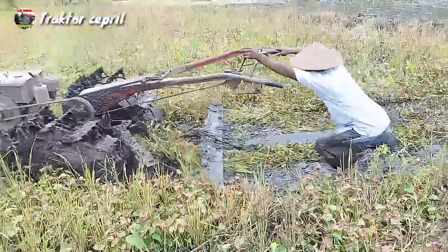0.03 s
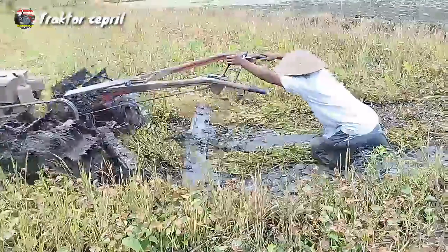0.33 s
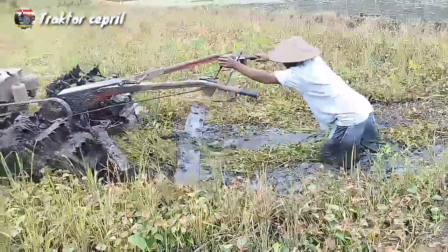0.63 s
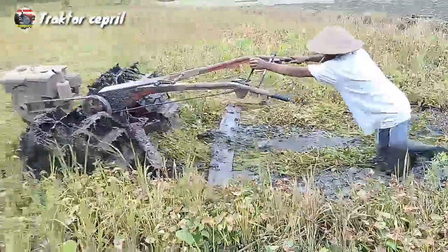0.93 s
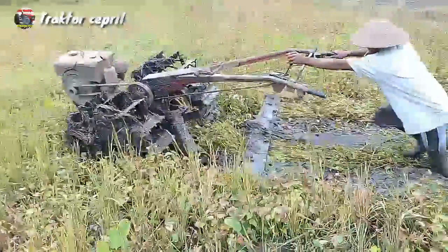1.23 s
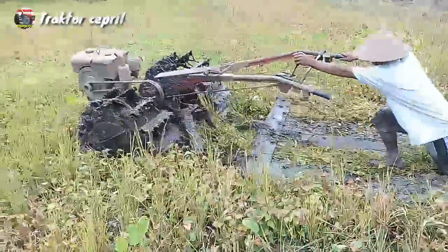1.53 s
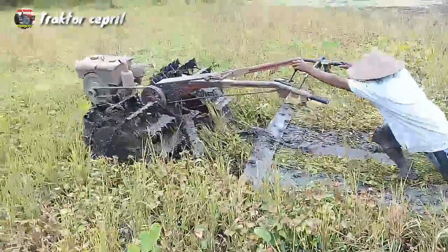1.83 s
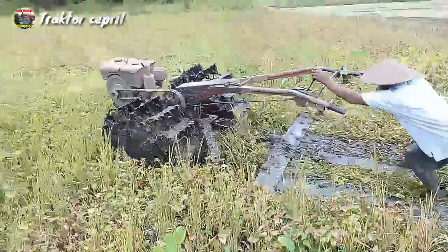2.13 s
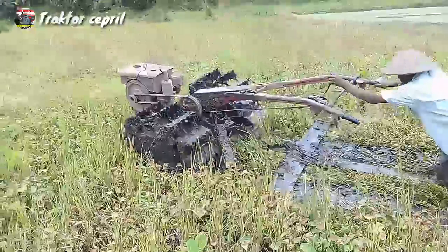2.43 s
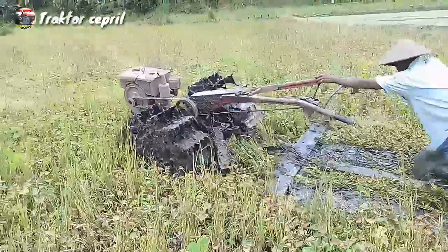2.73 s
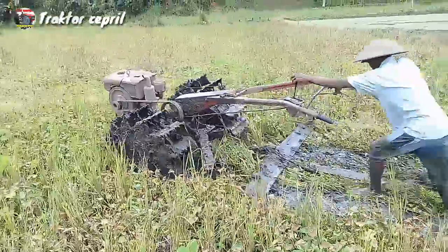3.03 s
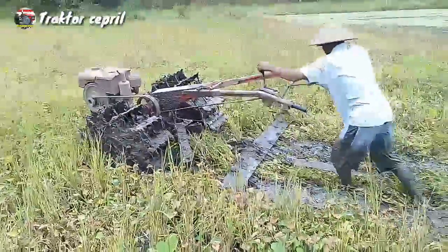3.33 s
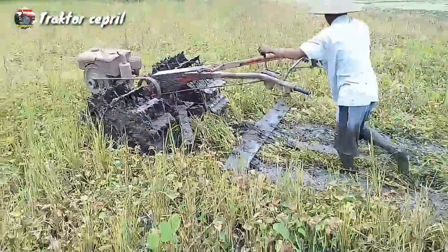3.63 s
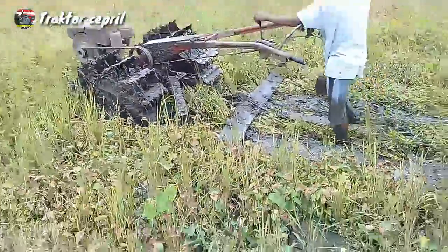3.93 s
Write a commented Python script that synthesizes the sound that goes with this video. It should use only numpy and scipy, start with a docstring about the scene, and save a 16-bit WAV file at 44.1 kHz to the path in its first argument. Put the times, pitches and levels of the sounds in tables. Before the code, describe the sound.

Walking tractor engine thumping and clattering through mud, gradually slowing before it speeds up again.

```python
"""Walking tractor in a wet field

A single-cylinder diesel slows under load and picks up again. Each cycle is a metallic combustion
knock, then an exhaust thump with a hissing blast through the muffler; gears clatter in between.
Mud spatters off the cage wheels and sprays once, the wet belt squeaks, and gusts bump the microphone."""
import sys
import numpy as np
from scipy import signal
from scipy.fft import rfft, irfft
from scipy.io import wavfile
from scipy.ndimage import uniform_filter1d

SR = 44100
rng = np.random.default_rng(int(sys.argv[2]) if len(sys.argv) > 2 else 0)


def persist_wave(psi):
    """Save psi, clipped to +-1, as 16-bit WAV."""
    counts = np.round(np.clip(psi, -1, 1) * 32767).astype(np.int16)
    wavfile.write(sys.argv[1], SR, np.atleast_2d(counts).T)


N = 176400
T = np.arange(N) / SR


def from_db(db):
    """Decibels to gain."""
    return 10 ** (np.asarray(db) / 20)


def unit_rms(x):
    """Scale to rms 1."""
    return x / np.sqrt(np.mean(x ** 2) + 1e-20)


def colour(x, spectrum):
    """EQ a signal with a curve of (frequency [Hz], relative level [dB]); rms 1."""
    hz, db = np.transpose(spectrum)
    bins_hz = np.maximum(np.arange(N // 2 + 1) * SR / N, 1)
    gain = from_db(np.interp(np.log(bins_hz), np.log(hz), db))
    return unit_rms(irfft(rfft(x) * gain, N))


def noise(spectrum):
    """Coloured noise of rms 1."""
    return colour(rng.standard_normal(N), spectrum)


def fader(points):
    """Gain that rides through points of (time [s], level [dB])."""
    return from_db(np.interp(T, *np.transpose(points)))


def bursts(times, levels_db, rise, t60, hold=0):
    """Envelope of bursts that rise, hold and fall by 60 dB; durations in seconds."""
    out = np.zeros(N)
    for start, db in zip(times, levels_db):
        span = slice(max(int(start * SR), 0), max(int((start + rise + hold + t60) * SR), 0))
        age = T[span] - start
        fall_db = 60 * np.maximum(age - rise - hold, 0) / t60
        out[span] += np.clip(age / rise, 0, 1) * from_db(db - fall_db)
    return out


def swells(rows):
    """Envelope of bursts, each with its own rise and decay."""
    return sum(bursts([start], [db], rise, t60) for start, rise, t60, db in rows)


def resonate(x, resonances):
    """Ring parallel band-pass resonators of alternating polarity."""
    out = 0
    for k, (hz, width, db) in enumerate(resonances):
        radius = np.exp(-np.pi * width / SR)
        poles = [1, -2 * radius * np.cos(2 * np.pi * hz / SR), radius ** 2]
        gain = (-1) ** k * from_db(db) * (1 - radius ** 2) / 2
        out = out + gain * signal.lfilter([1, 0, -1], poles, x + 1e-18)
    return out


def grain_sizes(spread_db):
    """Random gains for tiny impacts: many small, a few big."""
    return from_db(spread_db * np.minimum(rng.exponential(1, N), 4))


# The pulse of the exhaust: (time [s], relative thump level [dB], relative blast level [dB])
EXHAUST_STROKES = [(-0.016, -16.5, -14), (0.1088, -14, -20.0), (0.2362, -15, -22.5), (0.3627, -14.5, -21.5),
                   (0.4922, -15, -20), (0.621, -17.5, -21.5), (0.7515, -15.5, -21), (0.8826, -14, -22.5),
                   (1.0168, -19, -22), (1.1533, -20, -23), (1.2895, -15.5, -22.5), (1.43, -18, -23),
                   (1.5743, -17, -22.0), (1.7181, -17, -23.5), (1.8672, -17, -23), (2.0172, -17, -22.0),
                   (2.1708, -16.5, -25), (2.3284, -17.5, -24.5), (2.4877, -18, -25), (2.6532, -15, -22.5),
                   (2.8202, -19, -26.5), (2.9896, -18, -23.5), (3.16, -18, -25), (3.3248, -17.5, -23),
                   (3.4767, -17, -21.5), (3.6196, -14.5, -21), (3.7532, -15, -20), (3.8787, -14.5, -21)]
# Low body of the pipe: (frequency [Hz], relative level [dB], t60 [s], polarity)
PIPE_MODES = [(128.6, -8.5, 0.13, -1), (84.3, -4, 0.069, -1), (113.1, 1.04, 0.032, 1)]


def exhaust_thumps(gain_db=17):
    """Each release of gas sets the low modes of the exhaust ringing."""
    out = np.zeros(N)
    for start, db, _ in EXHAUST_STROKES:
        span = (T >= start) & (T < start + .25)
        age = T[span] - start
        for hz, mode_db, t60, polarity in PIPE_MODES:
            envelope = from_db(db + gain_db + mode_db - 60 * age / t60)
            out[span] += polarity * envelope * np.sin(2 * np.pi * hz * age)
    return out


# Tinny ring of the muffler: (frequency [Hz], bandwidth [Hz], relative level [dB])
MUFFLER_MODES = [(1045, 55.4, 8), (1424, 133, -1), (1820, 330, -12), (2705, 104, -4), (3735, 115, -10),
                 (4298, 88, -7.5), (5408, 119, 0), (5320, 600, -11.5), (6210, 170, -10.5),
                 (10120, 980, -19.5)]
# Hiss of the escaping gas: (frequency [Hz], relative level [dB])
JET_EQ = [(250, -11.5), (600, 10.5), (1100, -3), (2500, 12), (3300, -4), (6000, 8), (7600, -55),
          (11000, -6.5), (15500, -17)]


def exhaust_blasts(ring_db=18, hiss_db=-2, scatter_db=2.5):
    """A short turbulent jet rings the muffler with each thump, in a slightly new colour each time."""
    times, _, db = np.transpose(EXHAUST_STROKES)
    puff = bursts(times, db, rise=0.0042, t60=0.034, hold=0.0019)
    tail = bursts(times, db - 16.5, rise=0.0042, t60=.13)
    flow = puff + tail
    rings = []
    for jet in np.split(flow * rng.standard_normal(N), (times[1:] * SR).astype(int)):
        modes = [(hz, width, level + scatter_db * rng.normal()) for hz, width, level in MUFFLER_MODES]
        rings.append(resonate(jet, modes))
    return from_db(ring_db) * np.concatenate(rings) + from_db(hiss_db) * flow * noise(JET_EQ)


# Bumps of wind: (time [s], rise [s], t60 [s], level [dB])
GUSTS = [(-.02, 0.019, 0.45, -23.5), (.158, 0.0026, 0.029, -19), (.476, 0.0037, 0.2, -12),
         (.53, 0.041, 0.18, -23.5), (.922, 0.0088, 0.093, -11), (.95, 0.047, 0.34, -16.5),
         (1.068, 0.01, .08, -11), (1.10, 0.035, 0.53, -22), (2.195, 0.018, 0.15, -16),
         (2.23, 0.042, 0.57, -27.5), (2.66, 0.031, 0.67, -22), (2.72, 0.045, 0.54, -24)]
# Their dull boom: (frequency [Hz], relative level [dB])
GUST_EQ = [(20, -43), (60, -5.5), (120, -1.5), (195, -5.5), (260, -3.5), (350, -6), (480, -11.5),
           (900, -31), (3000, -76)]


def gusts():
    """Wind buffets the microphone: low noise, compressed so that each gust stays full."""
    air = noise(GUST_EQ)
    compressed = air / np.sqrt(uniform_filter1d(air ** 2, size=500) + 1e-3)
    return swells(GUSTS) * colour(compressed, GUST_EQ)


# Tone of the gears, belt and cage wheels: (frequency [Hz], relative level [dB])
CLATTER_EQ = [(30, -17), (200, -2.5), (330, 1), (560, -5), (800, 4.5), (1050, 2), (1500, -0.5),
              (2000, -5.5), (2600, -8), (3300, -22.5), (4400, -21.5), (5400, -14), (6500, -22), (7800, -35),
              (10300, -23.5), (13000, -32), (15500, -37)]
# Fader ride of the clatter: (time [s], level [dB])
CLATTER_FADER = [(0, -29.5), (.6, -31), (1.1, -29), (1.5, -32.5), (2.1, -32.5), (2.7, -32.5), (3.1, -34.5),
                 (3.5, -35), (4, -31.5)]


def drive_clatter(contacts_per_s=500, contact_db=-9.5):
    """Dense small contacts rattle in the drive over its steady rush."""
    sizes = grain_sizes(spread_db=2.5) * rng.choice([-1, 1], N)
    contacts = unit_rms(sizes * (rng.random(N) < contacts_per_s / SR))
    rush = rng.standard_normal(N)
    return fader(CLATTER_FADER) * colour(rush + from_db(contact_db) * contacts, CLATTER_EQ)


# Low end of the frame: (frequency [Hz], relative level [dB])
RUMBLE_EQ = [(15, -55), (30, -41), (50, -2.5), (70, 1), (130, 0), (195, -11.5), (270, -11), (500, -22.5),
             (1000, -59)]


def frame_rumble(level_db=-30.5):
    """The frame shakes with a steady bed of bass noise."""
    return from_db(level_db) * noise(RUMBLE_EQ)


# Fader ride of the spatter: (time [s], level [dB])
SPATTER_FADER = [(0, -45.5), (.6, -46), (1.15, -43), (1.5, -48), (2.1, -49), (2.6, -51), (3.0, -53.5),
                 (3.3, -51), (3.6, -61), (4, -50)]
# Its wet sizzle: (frequency [Hz], relative level [dB])
SPATTER_EQ = [(1200, -7), (3300, -4), (5400, -0.5), (7800, -10), (10500, -3.5), (15500, -8)]


def mud_spatter(drops_per_s=1300, t60=0.013):
    """Droplets off the cage wheels land at random, each a tiny splash."""
    drops = grain_sizes(spread_db=4) * (rng.random(N) < drops_per_s / SR)
    decay = from_db(-60 / (t60 * SR))
    splashes = signal.lfilter([1], [1, -decay], drops + 1e-18)
    return fader(SPATTER_FADER) * colour(splashes * rng.standard_normal(N), SPATTER_EQ)


def cycle_times(phase):
    """The moments that lie this fraction of a cycle after each exhaust stroke."""
    times = np.array(EXHAUST_STROKES)[:, 0]
    gaps = np.diff(times)
    return times + phase * np.r_[gaps, gaps[-1]]


# Tapping pattern of the valves: (delay after the exhaust [cycles], average level [dB])
VALVE_TAPS = [(.2, -30), (.4, -36.5), (.62, -66.5)]


def valve_taps(scatter_db=6.5):
    """The valve gear taps softly and unevenly at set points of the cycle."""
    envelope = np.zeros(N)
    for phase, db in VALVE_TAPS:
        levels_db = db + scatter_db * rng.standard_normal(len(EXHAUST_STROKES))
        envelope += bursts(cycle_times(phase), levels_db, rise=0.0016, t60=TAP_T60_S)
    return envelope * noise(CLATTER_EQ)


def intake(hz=769, width_hz=23, level_db=-32):
    """The intake pipe sounds a hollow note as the cylinder fills."""
    times = cycle_times(phase=0.3)
    note = unit_rms(resonate(rng.standard_normal(N), [(hz, width_hz, 0)]))
    return note * bursts(times, np.full(len(times), level_db), rise=0.014, t60=0.057)


# Combustion hits: (time [s], relative level [dB])
KNOCKS = [(0.083, -17), (0.2099, -16.5), (0.3364, -16), (0.4663, -15.5), (0.5949, -17.0), (0.7245, -14),
          (0.8554, -12.5), (0.9895, -15.5), (1.123, -12.5), (1.2605, -14), (1.3996, -16.0), (1.5436, -17.0),
          (1.6886, -16), (1.8361, -17.5), (1.9863, -18.5), (2.1395, -18.0), (2.2937, -17.5),
          (2.4535, -19.5), (2.618, -18), (2.785, -18.5), (2.9535, -20.5), (3.1254, -19), (3.2917, -20.5),
          (3.446, -20), (3.5901, -17), (3.726, -14.5), (3.8543, -19.5), (3.9738, -21)]
# The flam within each hit: (delay after ignition [s], relative level [dB])
SLAPS = [(.0008, -3.5), (.004, 2.5), (.012, -2)]
# Metallic ring of the block: (frequency [Hz], bandwidth [Hz], relative level [dB])
BLOCK_MODES = [(754, 83, -4), (1058, 54, 1.5), (1398, 37.5, 5), (1523, 72, 6), (1695, 30, -1.5),
               (1943, 61, -4.5), (2200, 260, -9.5), (2500, 410, -13), (2987, 110, -20)]
# Dry crack on top: (frequency [Hz], relative level [dB])
CRACK_EQ = [(300, -5), (700, -4), (1200, 0.5), (1700, 3), (2800, -7), (3500, -28), (6000, -21), (8000, -38),
            (15000, -29)]


def combustion_knocks(strike_db=32.5, buzz_db=6, crack_db=-6, jitter_s=0.00041, scatter_db=1):
    """Combustion and piston slap strike the block with a dry crack and leave it buzzing."""
    times, db = np.transpose(KNOCKS)
    force = bursts(times, db + buzz_db, rise=0.009, t60=0.24) * rng.standard_normal(N)
    for delay, slap_db in SLAPS:
        lateness, accent = rng.standard_normal((len(times), 2)).T
        hits = np.clip((times + delay + jitter_s * lateness) * SR, 0, N - 1).astype(int)
        force[hits] += from_db(db + strike_db + slap_db + scatter_db * accent)
    crack = bursts(times, db + crack_db, rise=0.00062, t60=0.13) * noise(CRACK_EQ)
    return resonate(force, BLOCK_MODES) + crack


def casing_clacks(start_hz=2469, end_hz=1427, fall_s=0.00444, gain_db=1):
    """The casing answers each knock with a short ring that falls in pitch."""
    out = np.zeros(N)
    for start, db in KNOCKS:
        span = (T >= start) & (T < start + .08)
        glide_hz = end_hz + (start_hz - end_hz) * np.exp((start - T[span]) / fall_s)
        detune = 1 + 0.02 * rng.normal()
        envelope = bursts([start], [db + gain_db], rise=0.0056, t60=.028)[span]
        out[span] += envelope * np.sin(2 * np.pi * np.cumsum(glide_hz * detune) / SR)
    return out


def belt_chirps(count=26, length_s=0.039, glide_spread=0.068, level_db=-47.5):
    """Squeak cues for the wet belt: faint glides at random moments and pitches."""
    times = rng.uniform(.5, 3.4, count)
    pitches_hz = rng.uniform(2880, 7010, count)
    return [(start, length_s, hz, hz * (1 + glide_spread * rng.normal()), level_db)
            for start, hz in zip(times, pitches_hz)]


# Featured squeaks: (time [s], length [s], start pitch [Hz], end pitch [Hz], level [dB])
SQUEAKS = [(1.086, 0.14, 6500, 6960, -42), (2.566, .045, 2490, 2480, -31)]


def belt_squeaks(waver_depth=0.04):
    """The rubbing belt gives brief wavering tones: two clear squeaks among faint chirps."""
    out = np.zeros(N)
    waver = unit_rms(uniform_filter1d(rng.standard_normal(N), size=100))
    for start, length, start_hz, end_hz, db in list(SQUEAKS) + belt_chirps():
        span = (T >= start) & (T < start + length)
        progress = (T[span] - start) / length
        hz = (start_hz + (end_hz - start_hz) * progress) * (1 + waver_depth * waver[span])
        envelope = from_db(db) * np.sin(np.pi * progress)
        out[span] += envelope * np.sin(2 * np.pi * np.cumsum(hz) / SR)
    return out


# A wash of mud with a sharp accent: (time [s], rise [s], t60 [s], level [dB])
SPRAYS = [(3.16, 0.09, 0.91, -24.5), (3.378, 0.0031, 0.04, -19.5)]
# Its slushy midrange: (frequency [Hz], relative level [dB])
SPRAY_EQ = [(300, -46), (700, 0), (1000, 8.5), (1500, -4), (2200, 7.5), (3000, -9.5), (4000, -19),
            (5600, -16), (8000, -35), (15000, -32)]


def mud_spray():
    """Mud flies off the wheels in a swell of noise."""
    return swells(SPRAYS) * noise(SPRAY_EQ)


# One hard tick: (time [s], rise [s], t60 [s], level [dB])
TICKS = [(3.378, 0.0022, 0.05, -33)]
# Its bright edge: (frequency [Hz], relative level [dB])
TICK_EQ = [(500, -12), (1500, -1), (2900, -2), (4500, -9), (8000, -7), (15500, -16)]


def wheel_tick():
    """A snap of noise in the wheels during the spray."""
    return swells(TICKS) * noise(TICK_EQ)


def scene():
    """Engine, drive, mud and wind, mixed in mono."""
    exhaust = exhaust_thumps() + exhaust_blasts()
    engine = exhaust + combustion_knocks() + casing_clacks() + valve_taps() + intake()
    mud = mud_spatter() + mud_spray() + wheel_tick()
    drive = drive_clatter() + frame_rumble() + belt_squeaks()
    return (engine + drive + mud + gusts())[None]


def record(dry, low_cut_hz=25, high_cut_hz=15750):
    """Master EQ: the deepest bass is rolled off, the top cut steeply."""
    low_cut = signal.butter(2, low_cut_hz, "high", fs=SR, output="sos")
    high_cut = signal.ellip(12, .1, 90, high_cut_hz, fs=SR, output="sos")
    return signal.sosfilt(high_cut, signal.sosfilt(low_cut, dry))


TAP_T60_S = 0.028

dry = scene()
out = record(dry)
persist_wave(out)
```